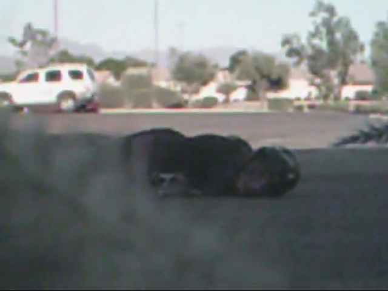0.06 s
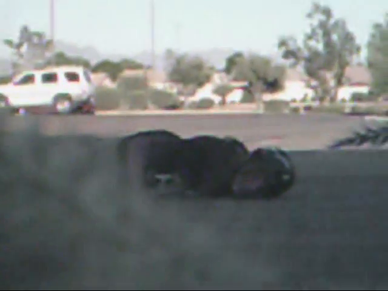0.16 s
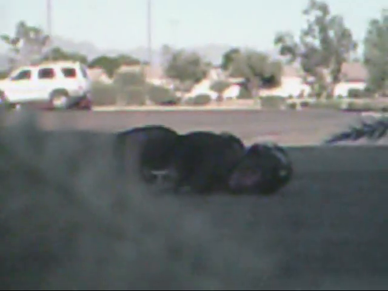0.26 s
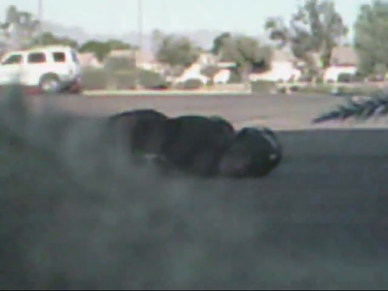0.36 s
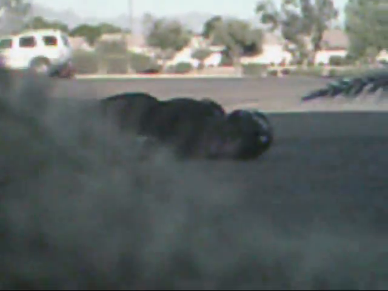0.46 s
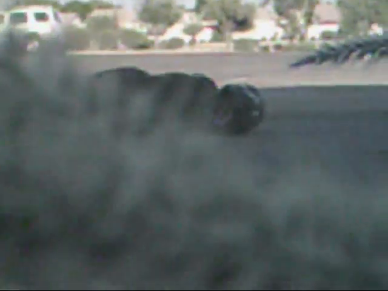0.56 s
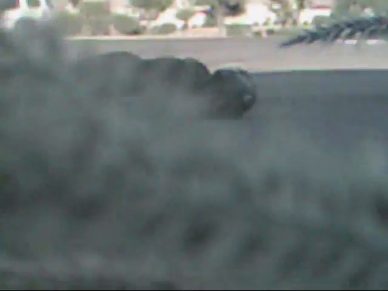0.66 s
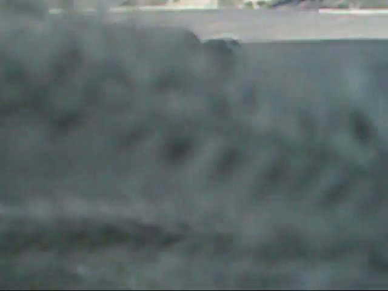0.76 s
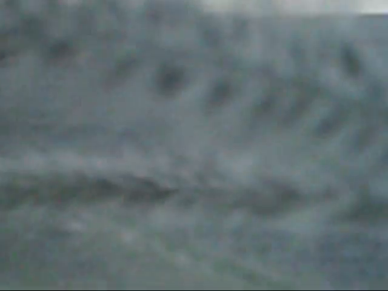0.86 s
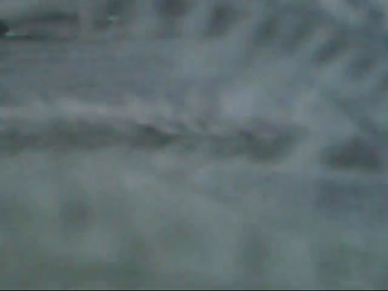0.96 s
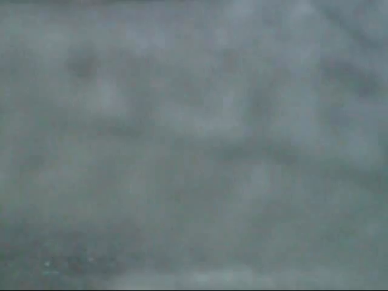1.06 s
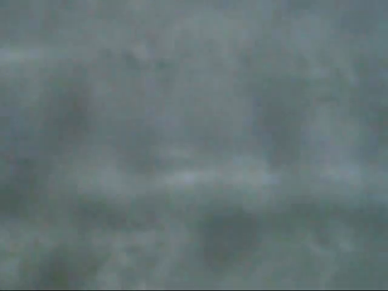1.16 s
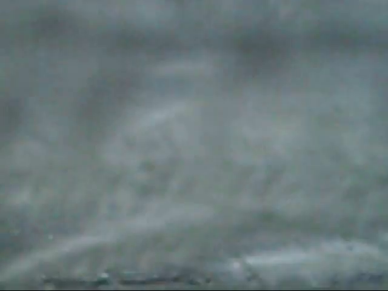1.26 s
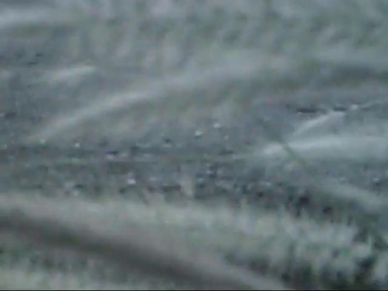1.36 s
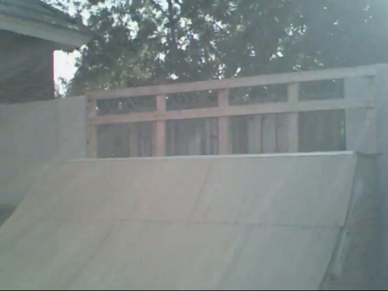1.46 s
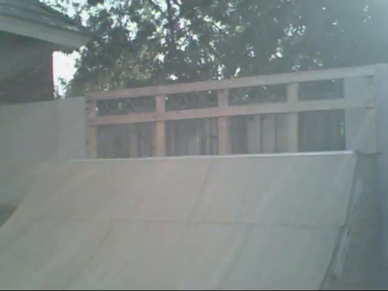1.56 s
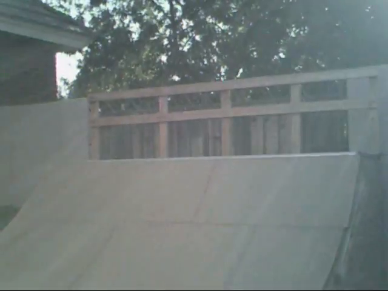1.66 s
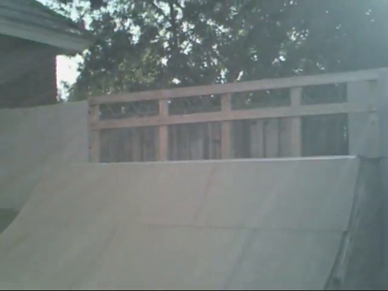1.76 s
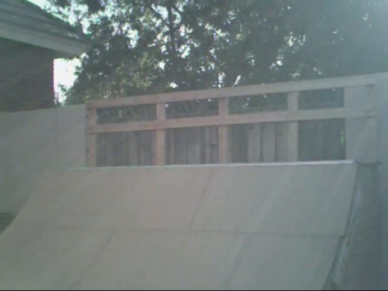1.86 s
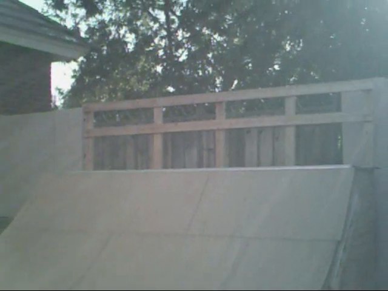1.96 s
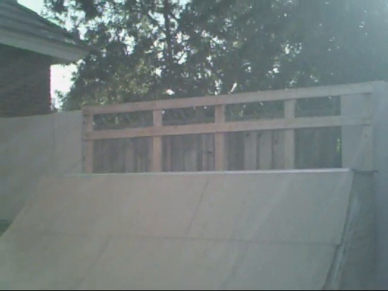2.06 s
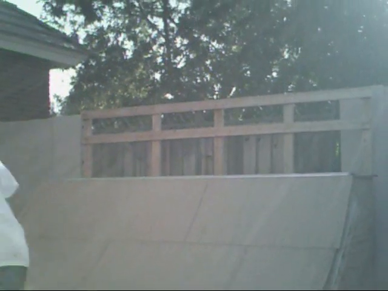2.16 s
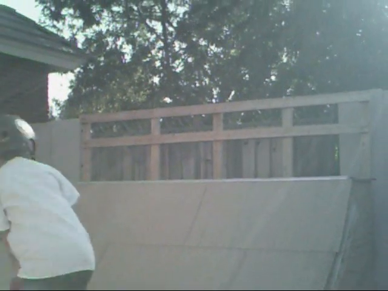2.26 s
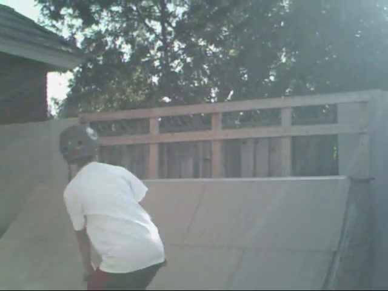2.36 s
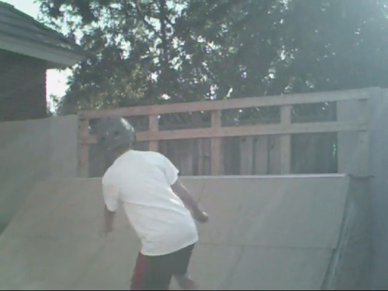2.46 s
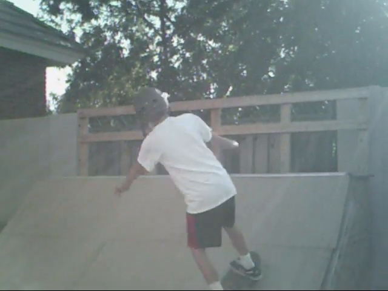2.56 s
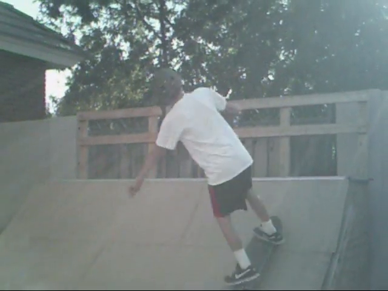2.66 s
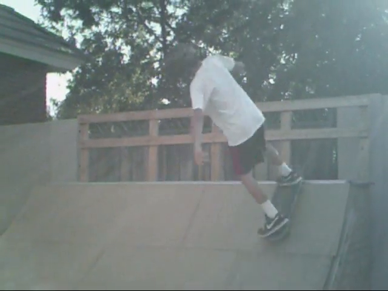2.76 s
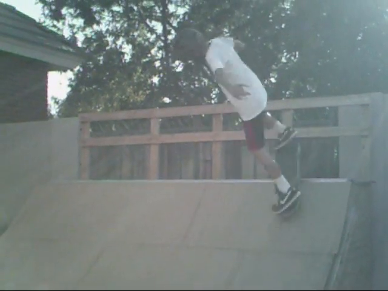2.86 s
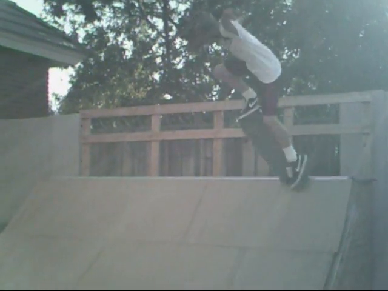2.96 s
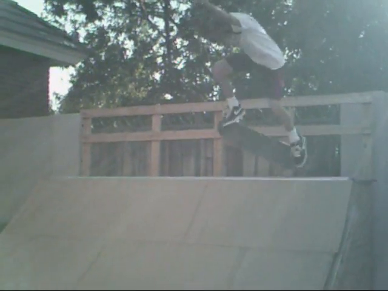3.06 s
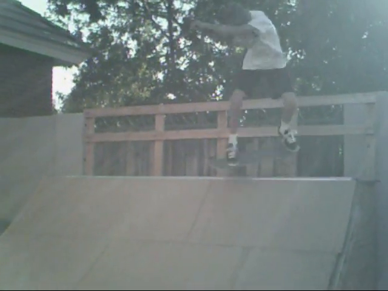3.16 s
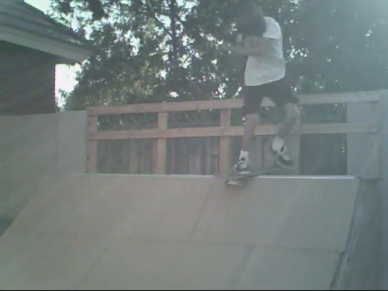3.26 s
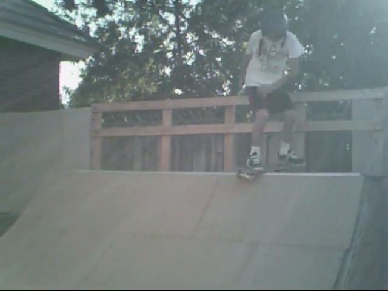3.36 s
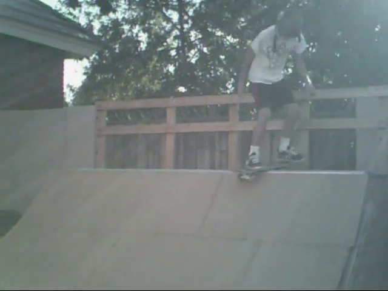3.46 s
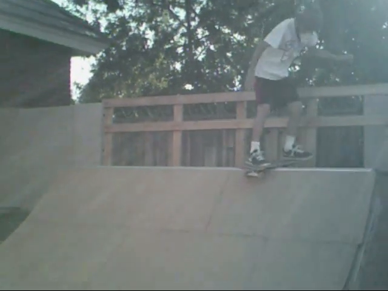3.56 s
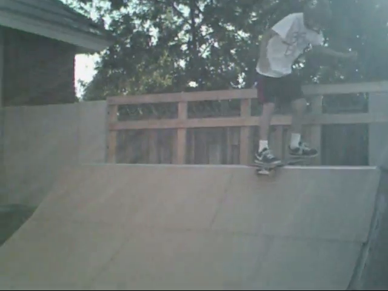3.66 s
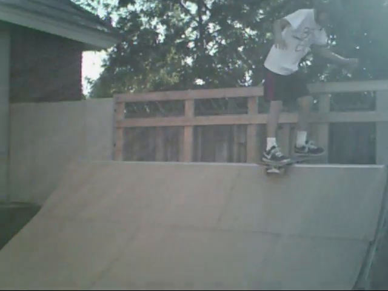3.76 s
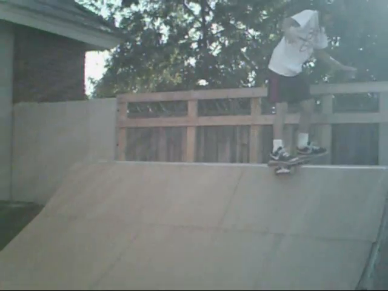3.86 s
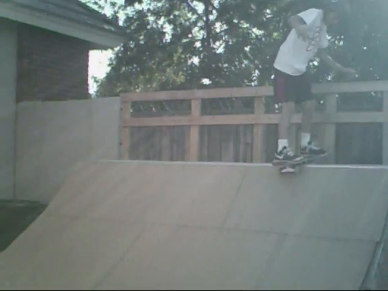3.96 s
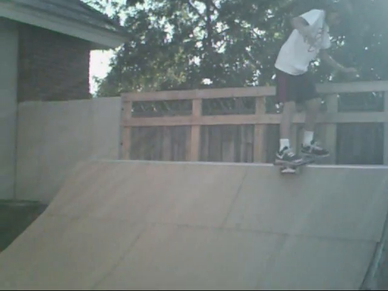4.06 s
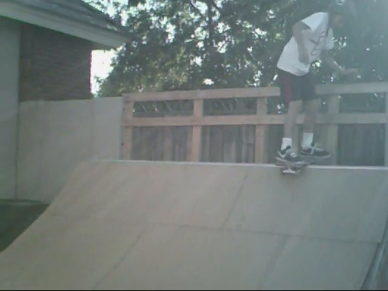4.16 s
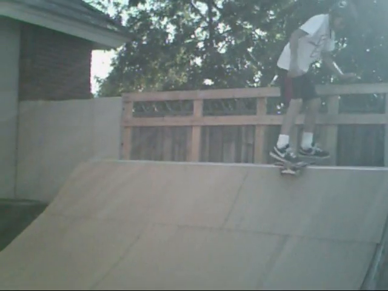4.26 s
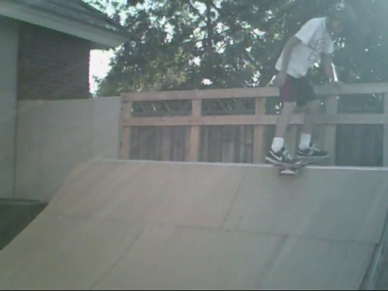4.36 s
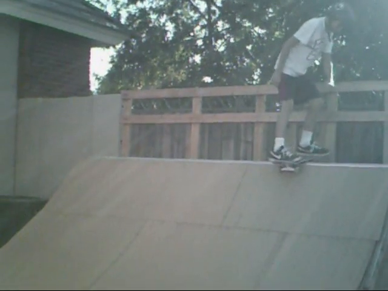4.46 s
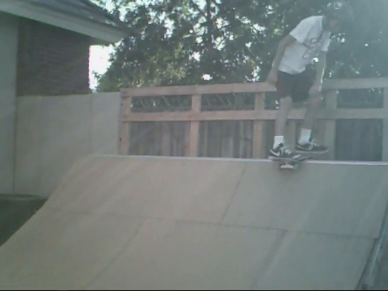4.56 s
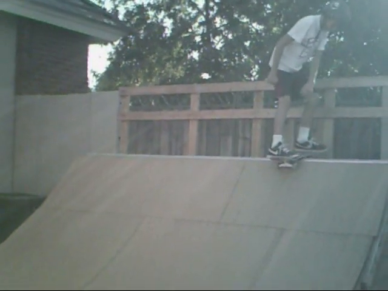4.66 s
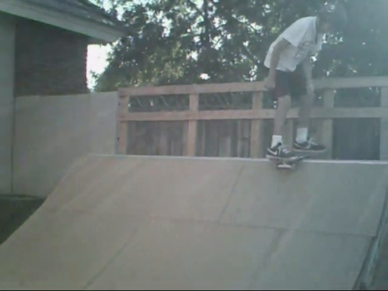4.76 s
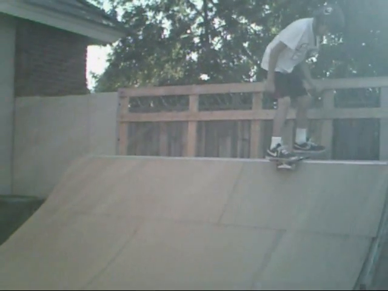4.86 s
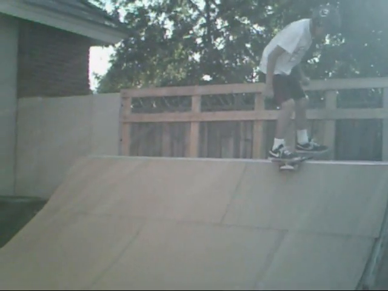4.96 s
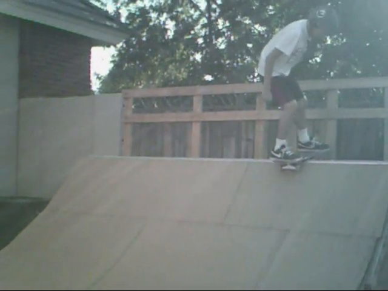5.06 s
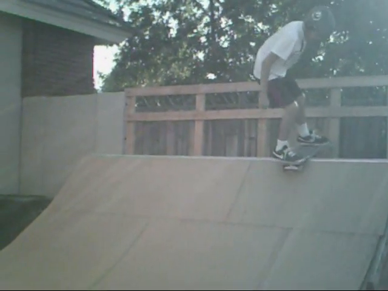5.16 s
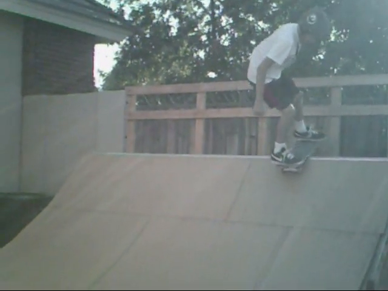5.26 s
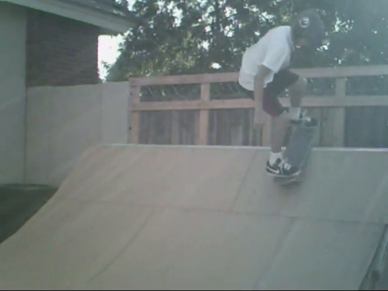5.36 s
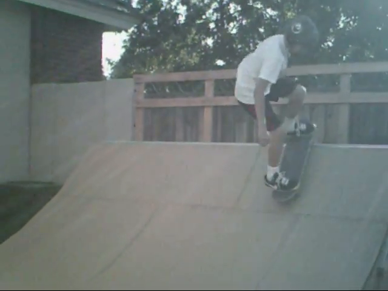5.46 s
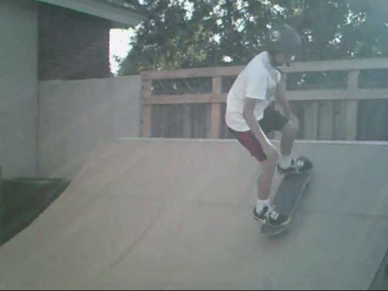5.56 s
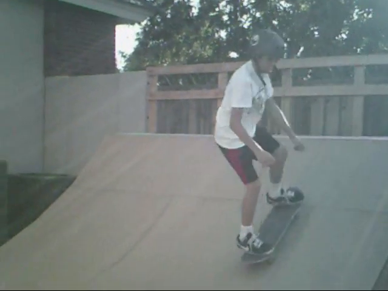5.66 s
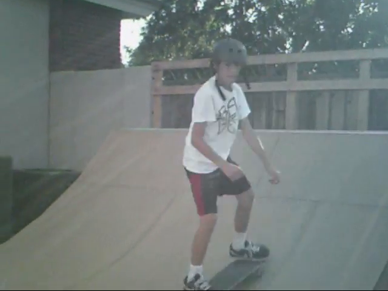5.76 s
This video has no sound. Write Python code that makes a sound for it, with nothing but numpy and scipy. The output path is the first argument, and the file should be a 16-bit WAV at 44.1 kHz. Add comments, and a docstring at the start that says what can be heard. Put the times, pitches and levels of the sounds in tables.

```python
"""A skateboard slaps down, rolls up a backyard plywood ramp, pops, lands on the deck and creeps to the edge,
then grates over the steel coping, overloading the microphone, and rolls back down.
Blows ring modes of ramp, deck and trucks; rolling and grating are random small impacts through resonances.
Before it a camera lies by a street where a distant motor hums in sine orders over traffic noise;
that sound cuts out, and after a short silence the ramp begins."""
import sys
import numpy as np
from scipy import signal
from scipy.fft import rfft, irfft, next_fast_len
from scipy.io import wavfile
from scipy.ndimage import map_coordinates

SR = 44100
rng = np.random.default_rng(int(sys.argv[2]) if len(sys.argv) > 2 else 0)


def unload_wav(signal):
    """Save mono or channel-first audio to the path in sys.argv[1] as 16-bit WAV at rate SR, clipped to [-1, 1]."""
    wavfile.write(
        sys.argv[1],
        SR,
        np.round(np.clip(np.atleast_2d(signal).T, -1, 1) * 32767).astype(np.int16),
    )


N = 255780

CUT_OUT_S, CUT_IN_S = 1.52, 1.585  # the street stops, the ramp starts
POP_S, LANDING_S = 2.9094, 3.3313  # the jump

# All levels in the tables are relative: spectra are scaled to rms 1 and layers get further trims.
# wheel and truck resonances: centre_hz, width_hz, level_db
WHEEL_RESONANCES = [(765, 88, 4), (1498, 194, -0.5), (2235, 430, -9), (3470, 107, -10.5)]
# the coping pipe's resonances: centre_hz, width_hz, level_db
PIPE_RESONANCES = [(2580, 270, -2.5), (3440, 1100, -2.5), (4130, 470, -2.5), (5050, 400, -5.5)]
# colour of grit under wheels and shoes: frequency_hz, level_db (per Hz)
GRIT_SPECTRUM = [(2000, 3), (3800, 6), (5000, 3.5), (7000, 5), (9000, 1), (10500, -9.5)]
# the hollow under the ramp: frequency_hz, level_db (per Hz)
HOLLOW_SPECTRUM = [(20, -12), (48, -2.5), (90, -2.5), (135, -1), (220, -7), (400, -15), (900, -26),
                   (3000, -73)]
# the ride after landing: time_s, drive_db (speed and nearness), load_db (weight pressed into the ramp)
RIDE_DOWN = [(3.62, -56, 14.5), (4.25, -52.5, 14), (4.65, -49, 15), (5.03, -43, 10), (5.35, -39, 12.5),
             (5.43, -31.5, 10.5), (5.485, -21.5, 0), (5.53, -37, 12.5), (5.69, -47, 12.5), (5.8, -41, 13.5)]


def amp(db):
    """Decibels to gain."""
    return 10 ** (np.asarray(db) / 20)


def unit(x):
    """Scaled to rms 1."""
    return x / np.sqrt(np.mean(x ** 2) + 1e-20)


def along(points, hz):
    """(Hz, value) points read on a log frequency axis."""
    point_hz, value = np.transpose(points)
    return np.interp(np.log(hz + 1), np.log(point_hz + 1), value)


def curves(rows):
    """One value per sample for each column after the time."""
    time_s, *columns = np.transpose(rows)
    return [np.interp(np.arange(N) / SR, time_s, column) for column in columns]


def wobble(rate):
    """A smooth random curve, rate knots a second."""
    knots = rng.standard_normal(int(N * rate / SR) + 4)
    return map_coordinates(knots, [np.arange(N) * rate / SR])


def swell(start, end, attack_s, release_s):
    """Full level from start to end; rises 60 dB in attack_s before and falls 60 dB in release_s after."""
    t = np.arange(N) / SR
    return fade(np.maximum(start - t, 0), attack_s) * fade(np.maximum(t - end, 0), release_s)


def fade(t, t60):
    """Exponential decay, 60 dB in t60 seconds."""
    return np.exp(-np.log(1000) * t / max(t60, 1e-3))


def filtered(x, response):
    """x shaped by a response of frequency."""
    size = next_fast_len(len(x) + SR // 4)
    return irfft(rfft(x, size) * response(np.fft.rfftfreq(size, 1 / SR)), size)[:len(x)]


def coloured(x, spectrum):
    """x shaped by a (Hz, dB) spectrum, at rms 1."""
    return unit(filtered(x, lambda hz: amp(along(spectrum, hz))))


def resonant(x, modes):
    """x through parallel (Hz, width Hz, dB) resonances of alternating sign, at rms 1."""
    def response(hz):
        total = 0
        for k, (centre, width, db) in enumerate(modes):
            damping = 1j * hz * width
            total = total + (-1) ** k * amp(db) * damping / (centre * centre - hz * hz + damping)
        return total
    return unit(filtered(x, response))


def noise(spectrum, size=N):
    """Coloured noise of rms 1."""
    return coloured(rng.standard_normal(size), spectrum)


def bumps(rate, spread_db):
    """Random little impacts of uneven size and either sign, rate a second, at rms 1."""
    hit, size = rng.random(N), rng.standard_normal((2, N))
    return unit((hit < rate / SR) * np.sign(size[0]) * amp(spread_db * np.tanh(size[1])))


def ring(modes, t, t60, tilt_db=0):
    """Modes struck together, rms about 1 at the start; a harder blow favours the upper ones."""
    hz, db = np.transpose(modes)
    size, detune, phase = rng.standard_normal((3, len(hz)))
    gain = amp(db + 2 * size + tilt_db * np.log2(hz / hz[0]))
    waves = np.sin(2 * np.pi * np.outer(hz * (1 + 0.021 * detune), t) + phase[:, None])
    decay = fade(t, t60)
    return unit(gain @ waves * decay) * np.sqrt(np.mean(decay ** 2))


def add(track, s, sound):
    """Mix a sound into the track at s seconds."""
    part = track[round(s * SR):][:len(sound)]
    part += sound[:len(part)]


def street():
    """Traffic wash, a slightly unsteady motor hum, a faint whine and the rustle of fingers on the camera."""
    # traffic wash: frequency_hz, level_db (per Hz)
    traffic_spectrum = [(25, -15), (45, -8), (90, -6), (160, -10.5), (240, -10), (320, -17.5), (480, -20),
                        (780, -19.5), (1100, -26), (1700, -35), (2500, -46.5), (4000, -51.5),
                        (10500, -57.5)]
    # motor orders: multiple, level_db
    hum_orders = [(1, 2), (2, -10), (3, -18)]
    # the hum wavers: time_s, level_db
    hum_level = [(0, -30), (0.15, -28), (0.4, -28.5), (0.58, -34), (0.66, -31.5), (0.8, -37), (0.89, -30),
                 (1.19, -34), (1.366, -28.5), (1.5, -32)]
    hum_hz, traffic_db, whine_db, overtone_db, handling_db = 250.4, -32, -73.5, -40, -51.5

    turns = np.cumsum(hum_hz * (1 + 0.0013 * wobble(6.9))) / SR
    orders = sum(amp(db + wobble(7.25)) * np.sin(2 * np.pi * round(k) * turns) for k, db in hum_orders)
    hum = amp(curves(hum_level)[0]) * orders
    # the highest order swells briefly
    overtone_wave = np.sin(2 * np.pi * round(hum_orders[-1][0]) * turns)
    overtone = amp(overtone_db) * swell(0.82, 0.91, attack_s=0.25, release_s=0.3) * overtone_wave
    whine = amp(whine_db) * resonant(rng.standard_normal(N), [(6640, 21, 0)])
    # fingers take hold of the camera just before the cut
    skin = [(800, -15), (2300, -6), (3200, 4), (4800, -2), (7000, -2), (10500, -14)]
    grip = amp(handling_db) * swell(1.39, CUT_OUT_S, attack_s=0.015, release_s=0.01)
    rustle = grip * coloured(bumps(2500, 3.5), skin)
    return amp(traffic_db) * noise(traffic_spectrum) + hum + overtone + whine + rustle


def yard():
    """Quiet outdoor air, with a breeze rumbling on the microphone as low noise of uneven level."""
    # outdoor air: frequency_hz, level_db (per Hz)
    air_spectrum = [(25, -11), (60, 14.5), (150, 0.5), (400, -6.5), (800, -9.5), (2000, -25.5),
                    (5000, -28.5), (10500, -40)]
    # air on the microphone: time_s, level_db
    breeze_level = [(1.6, -56), (1.8, -47), (3.22, -37), (3.44, -28.5), (3.9, -35), (4.62, -29), (4.9, -49),
                    (5.5, -28.5), (5.8, -27.5)]
    buffet = noise([(15, 3.5), (45, -6.5), (80, -14), (160, -16), (500, -60.5)])
    breeze = amp(curves(breeze_level)[0] + 1.5 * wobble(10)) * buffet
    return amp(-41.5) * noise(air_spectrum) + breeze


def echo(x):
    """Fences and house wall scatter a short tail, treble dying first."""
    # the yard's decay: frequency_hz, t60_s
    fence_decay = [(100, 0.62), (700, 0.35), (2500, 0.28), (10000, 0.21)]
    hz, t, z = signal.stft(rng.standard_normal(SR // 2), SR, nperseg=256)
    decaying = z * amp(-60 * t / along(fence_decay, hz)[:, None])
    tail = signal.istft(decaying, SR, nperseg=256)[1]
    tail *= 1 - fade(np.arange(len(tail)) / SR, 0.053)  # reflections build up gradually
    return signal.fftconvolve(x, tail / np.linalg.norm(tail))[:len(x)]


def ticks():
    """Dry clicks from the camera body, and grit snapping under the wheels, as short noise bursts."""
    # small sharp ticks: start_s, body_db, snap_db, snap_t60_s
    tick_list = [(0.325, -32.5, -48, 0.018), (.9275, -43, -57, .013), (1.3905, -49, -27, 0.02),
                 (1.4455, -47, -44, .032), (4.7278, -21.5, -33.5, .008), (5.287, -28, -45, .012),
                 (5.33, -25, -39, .016), (5.421, -19, -45, .012), (5.606, -24, -33, .015)]
    body_spectrum = [(200, -16), (700, 11.5), (1800, -3), (4500, -12), (10000, -27)]
    snap_spectrum = [(1500, -11), (4500, -7.5), (7000, 6), (10500, -1), (12000, -48)]
    out, t = np.zeros(N), np.arange(SR // 8) / SR
    for s, body_db, snap_db, t60 in tick_list:
        body = amp(body_db + 4.5) * noise(body_spectrum, size=len(t))
        snap = amp(snap_db - 1) * noise(snap_spectrum, size=len(t))
        add(out, s, body * fade(t, 0.0097) + snap * fade(t, t60))
    return out


def platform():
    """On top of the ramp sand cracks under the creeping wheels and shoes scuff the grip tape."""
    # shoes shift on the grip tape: start_s, length_s, level_db
    scuffs = [(3.988, 0.064, -54.5), (4.506, .05, -54), (5.19, 0.012, -41.5), (5.228, .02, -40)]
    sand_db = -12.5  # over the drive
    sand_end_s = 5.33  # the wheels leave the sandy platform
    scuff_ramp = 1.8  # rise and fall, in lengths of the scuff

    drive_db, _ = curves(RIDE_DOWN)
    grains = coloured(bumps(110, 6.8), [(1000, -7), (3000, 4), (5100, 10), (6500, -15), (10500, -20)])
    creeping = swell(RIDE_DOWN[0][0], sand_end_s, attack_s=0.093, release_s=0.3)
    sand = amp(drive_db + sand_db) * creeping * grains
    strokes = 0
    for s, length, db in scuffs:
        strokes = strokes + amp(db) * swell(s, s + length, scuff_ramp * length, scuff_ramp * length)
    return sand + amp(-12) * echo(sand) + strokes * coloured(bumps(3000, 3), GRIT_SPECTRUM)


def spinning():
    """From the pop on the free wheels whirr on their bearings, fading slowly, then faster after landing."""
    spin_db, ring_db, fade_db_per_s = -51, 4, 4.5
    aloft_s = np.maximum(np.arange(N) / SR - POP_S, 0)
    whirr = noise(GRIT_SPECTRUM) + amp(ring_db) * resonant(rng.standard_normal(N), WHEEL_RESONANCES)
    # the hanging wheels run on after the landing
    presence = swell(POP_S, LANDING_S, attack_s=0.02, release_s=1.7)
    return amp(spin_db - fade_db_per_s * aloft_s) * presence * whirr


def rolling(ride):
    """Bumps in the surface shake the hollow ramp, ring the wheels and crush grit, all following the drive."""
    # the ramp under the wheels: frequency_hz, level_db (per Hz)
    plywood_spectrum = [(35, -49), (60, -12.5), (136, 0.5), (231, -5), (285, -6), (322, -3), (397, -10.5),
                        (433, -6.5), (515, -13.5), (569, -11), (784, -21.5), (955, -41), (1150, -47),
                        (1500, -67), (2530, -120)]
    rumble_db, wheel_db = -0.4, 3.5  # over the drive
    lumps_db, lumps_per_s = 0.8, 22  # uneven plywood makes the rumble surge
    cruise_db, hiss_db, hiss_growth = -39.5, -48, 0.85  # hiss at cruising drive, and its dB per dB of drive

    drive_db, load_db = curves(ride)
    # the rolling dies away when the wheels leave the ramp
    contact = swell(ride[0][0], ride[-1][0], attack_s=0.0092, release_s=0.078)
    surface = unit(bumps(1800, 2.6) + 0.82 * rng.standard_normal(N)) * amp(1.28 * wobble(35))
    rumble_level = drive_db + load_db + rumble_db + lumps_db * wobble(lumps_per_s)
    rumble = amp(rumble_level) * coloured(surface, plywood_spectrum)
    wheels = amp(drive_db + wheel_db) * resonant(surface, WHEEL_RESONANCES)
    crushed = coloured(surface + 0.64 * rng.standard_normal(N), GRIT_SPECTRUM)
    hiss = amp(hiss_db + hiss_growth * (drive_db - cruise_db)) * crushed
    return contact * (rumble + wheels + hiss)


def strike(thud_db, clack_db, truck_db, crack_db, t60, echo_db, at_lip):
    """One blow cracks, rings the maple deck and its trucks, booms in the ramp and, at the lip, rings the coping."""
    # modes of ramp panels, deck and trucks: frequency_hz, level_db
    ramp_modes = [(48, 1), (78, -5), (131, -0.5), (176, -3.5), (208, -4), (255, 0), (318, 0.5)]
    deck_modes = [(425, -0.5), (470, -11), (565, -3.5), (675, -1.5), (775, -3.5), (895, -6)]
    truck_modes = [(1260, -8.5), (1340, 4), (1450, 1.5), (1560, -1.5), (1700, -3.5), (1920, -1.5),
                   (2080, -6), (2260, -6.5), (3100, -34), (3350, -31)]
    # the noise of contact: frequency_hz, level_db (per Hz)
    crack_spectrum = [(300, 8), (1200, 6.5), (2600, 3), (3600, -1), (5500, -4), (8000, -3.5), (10500, -17)]
    pipe_db = -2.5  # the pipe rings under the crack

    t = np.arange(SR * 3 // 4) / SR
    panels = amp(-2.5) * ring(ramp_modes, t, 0.17)
    hollow = amp(-1.5) * noise(HOLLOW_SPECTRUM, size=len(t)) * fade(t, 0.45)
    thud = amp(thud_db) * (panels + hollow) * (1 - fade(t, 0.035))  # the heavy ramp is slow to start
    # deck tilt in dB per octave; it grows as the trucks outweigh the thud
    hardness_db = 4.6 + 1.1 * (truck_db - thud_db)
    clack = amp(clack_db + 3) * ring(deck_modes, t, t60, tilt_db=hardness_db)
    truck = amp(truck_db + 1.5) * ring(truck_modes, t, t60)
    pipe = at_lip * amp(pipe_db) * resonant(rng.standard_normal(len(t)), PIPE_RESONANCES[1:2])
    crack = amp(crack_db) * (amp(3) * noise(crack_spectrum, size=len(t)) + pipe) * fade(t, t60)
    board = (clack + truck + crack) * (1 - fade(t, 0.004))
    return thud + board + amp(echo_db) * echo(board)


def blows():
    """The board slaps down, bumps softly over the seams, then pops, lands and rocks at the lip."""
    # blows of the board and the parts they reach:
    # start_s, ramp_thud_db, deck_clack_db, truck_ring_db, crack_db, board_t60_s, echo_db (against the board)
    blow_list = [ (1.607, -64, -42, -66, -72, 0.073, -3), (1.6867, -32, -11.5, -27, -23.5, 0.049, -4.5),
                 (1.691, -22.5, 0.5, -26, -23.5, 0.039, -18), (1.697, -23, -18, -15, -15, 0.013, -16),
                 (2.9091, -25.5, -12.5, -18.5, -23.5, 0.032, -11.5),
                 (3.056, -26.5, -27, -32, -42, .055, -5), (3.3239, -32, -47, -39, -24, 0.06, -3),
                 (3.3311, -24, -8, -8, -14, 0.035, -11), (3.338, -18.5, -9, -20, -16, 0.044, -8),
                 (3.354, -13.5, -21, -22.5, -17.5, 0.045, -6),
                 (3.571, -29.5, -40.5, -32.5, -42.5, 0.056, -8.5),
                 (3.698, -22.5, -28, -20.5, -29.5, 0.055, -7), (5.226, -24, -27, -27, -34.5, 0.062, -3.5),
                 (5.5872, -21.5, -9.5, -16.5, -19.5, 0.033, -13), ]
    # wheels bump over plywood joints: start_s, deck_knock_db
    seams = [(1.764, -12.5), (2.01, -25), (2.076, -19), (2.176, -22.5), (2.36, -24.5)]
    thud_db, truck_db, crack_db = -2, -20, -19  # at a seam, against the deck's knock
    seam_t60_s, seam_echo_db = 0.054, -7.5

    out = np.zeros(N)
    for s, *parts_db in blow_list:
        add(out, s, strike(*parts_db, at_lip=s > seams[-1][0]))  # the lip lies past the last seam
    for s, db in seams:
        bump = strike(db + thud_db, db, db + truck_db, db + crack_db, seam_t60_s, seam_echo_db, at_lip=False)
        add(out, s, bump)
    return out


def coping():
    """The deck shudders as it tips in, grates over the steel pipe in a dense burst of slips, then thumps the ramp."""
    # the tipping deck: centre_hz, width_hz, level_db
    shudder_modes = [(763, 126, 2), (956, 88, -8)]
    # board against pipe: frequency_hz, level_db (per Hz)
    grating_spectrum = [(40, -8), (150, 2), (400, 4), (850, 1.5), (1500, 2.5), (3000, -2.5), (6000, -1),
                        (10500, -5.5)]
    tip_s, grate_s, slam_s, slam_end_s = 5.443, 5.493, 5.521, 5.539
    shudder_db, grate_db, pressed_db, touching_db, slam_db, boom_db = -19, 1, -14.5, -34.5, -7.5, -23

    tipping = amp(shudder_db) * swell(tip_s, tip_s + 0.019, attack_s=0.14, release_s=0.25)
    # resonated twice for narrower peaks
    shudder = tipping * resonant(resonant(bumps(810, 2.7), shudder_modes), shudder_modes)
    slips = unit(bumps(4000, 3.4) + 0.96 * rng.standard_normal(N)) * amp(2.8 * wobble(350))
    grinding = amp(grate_db) * swell(grate_s, slam_s, attack_s=0.0071, release_s=0.0085)
    grate = grinding * coloured(slips, grating_spectrum)
    # the pipe rings under pressure, with a fainter, longer ring around it
    pressed = amp(pressed_db) * swell(grate_s, slam_end_s, attack_s=0.024, release_s=0.01)
    touching = amp(touching_db) * swell(grate_s, slam_end_s + 0.035, attack_s=0.24, release_s=0.077)
    pipe = (pressed + touching) * resonant(bumps(4000, 3), PIPE_RESONANCES)
    # the board's weight falls on the ramp, which booms on
    thump = noise([(20, -23), (40, 0.5), (75, -3), (300, -6), (700, -10.5), (2000, -21), (6000, -40)])
    slam = amp(slam_db) * swell(slam_s, slam_end_s, attack_s=0.032, release_s=0.032) * thump
    booming = amp(boom_db) * swell(slam_s, slam_end_s, attack_s=0.023, release_s=0.4)
    return shudder + grate + pipe + slam + booming * noise(HOLLOW_SPECTRUM)


def scene():
    """The street, a short silence, then the ramp; ticks lie over both."""
    # the ride up to the jump: time_s, drive_db (speed and nearness), load_db (weight pressed into the ramp)
    ride_up = [(1.7, -35.5, 14), (1.765, -35, 16.5), (1.83, -41, 13), (1.98, -41.5, 16),
               (2.04, -39.5, 17.5), (2.45, -39.5, 17), (2.6, -40, 21.5), (2.86, -42.5, 11),
               (3.14, -51.5, 11)]
    t = np.arange(N) / SR
    riding = rolling(ride_up) + spinning() + rolling(RIDE_DOWN)
    skating = yard() + riding + platform() + blows() + coping()
    return ((t < CUT_OUT_S) * street() + (t > CUT_IN_S) * skating + ticks())[None]


def record(dry):
    """The microphone overloads softly on the loudest blows; the camera's band ends steeply."""
    ceiling, top_hz = 1.05, 10720
    clipped = dry[0] / (1 + np.abs(dry[0] / ceiling) ** 6) ** (1 / 6)
    return filtered(clipped, lambda hz: 1 / np.sqrt(1 + (hz / top_hz) ** 140))[None]


dry = scene()
out = record(dry)
unload_wav(out)
```